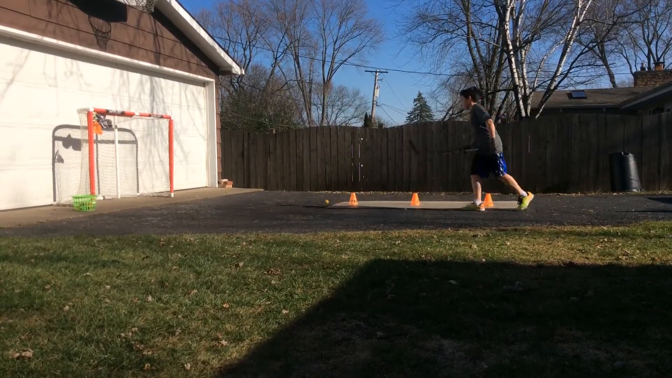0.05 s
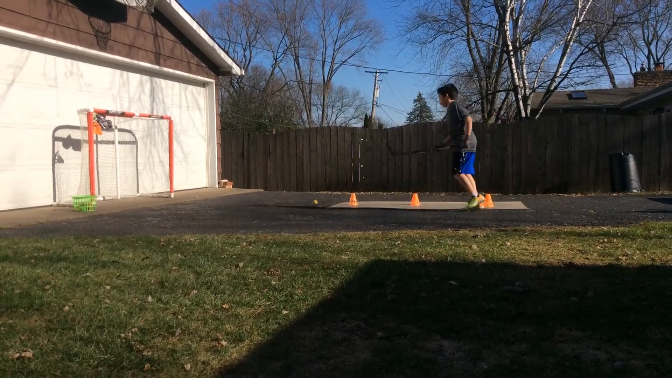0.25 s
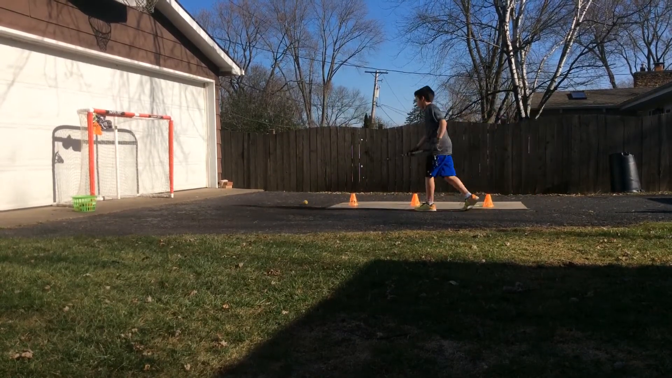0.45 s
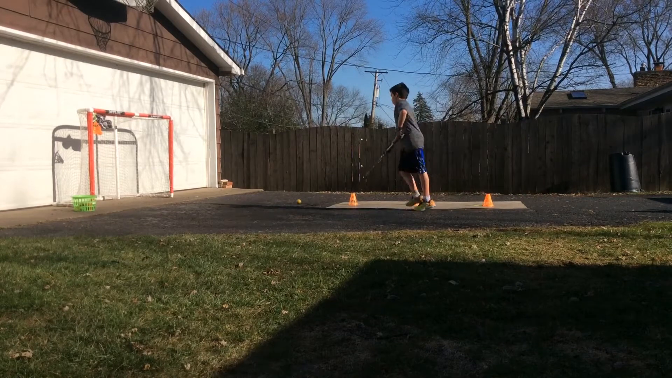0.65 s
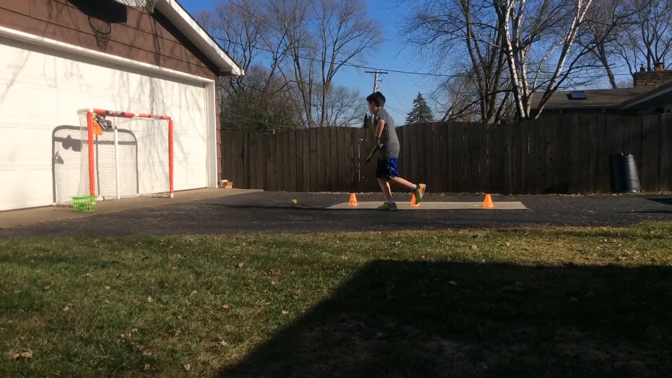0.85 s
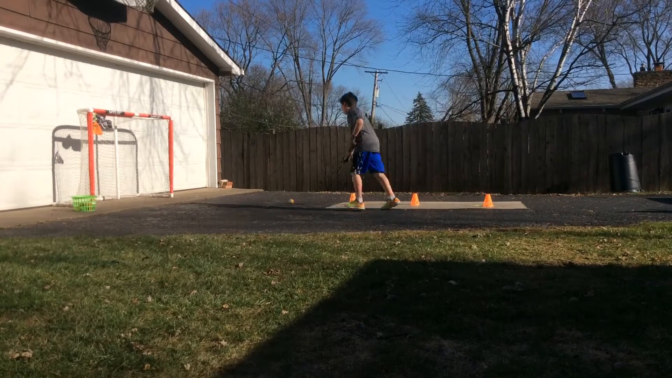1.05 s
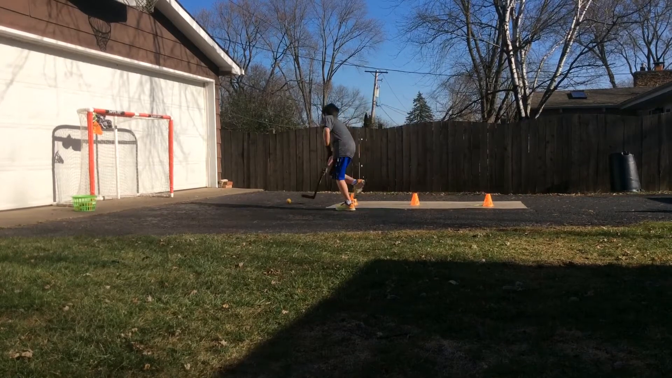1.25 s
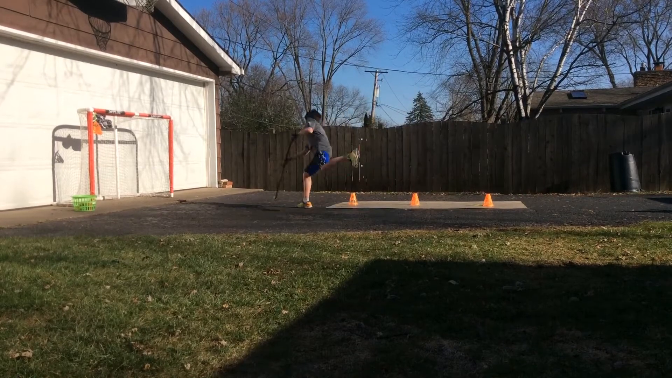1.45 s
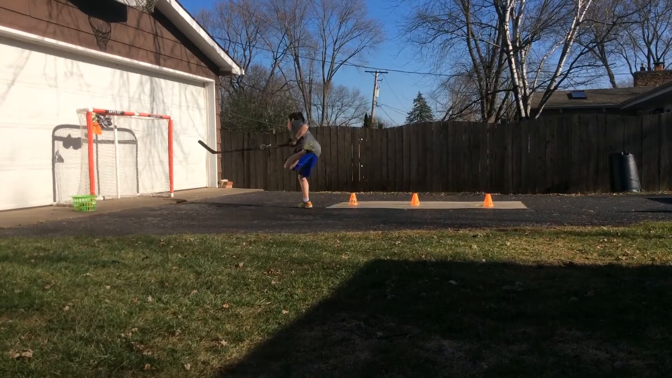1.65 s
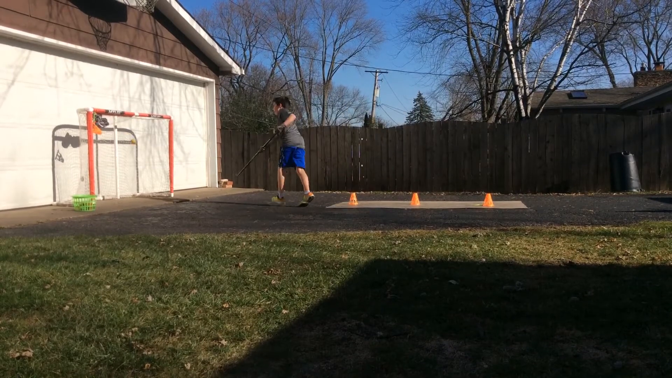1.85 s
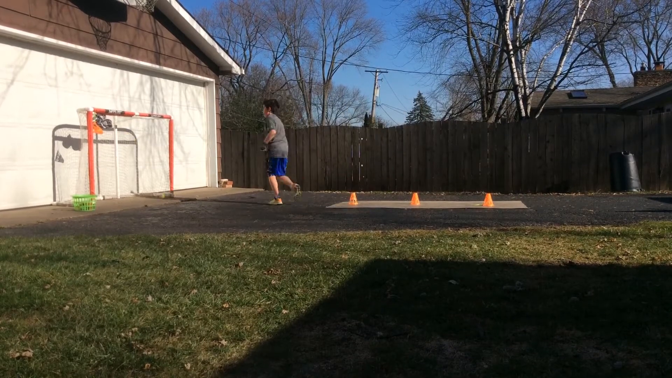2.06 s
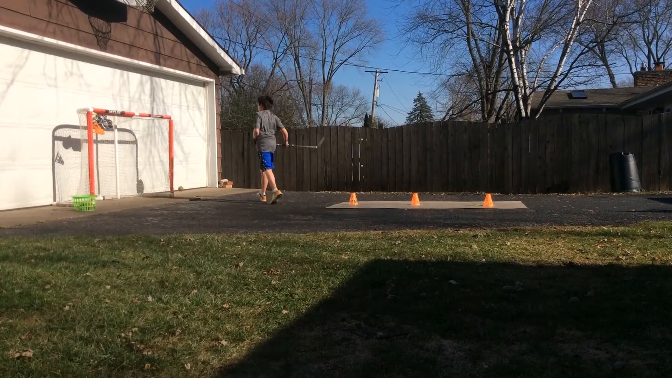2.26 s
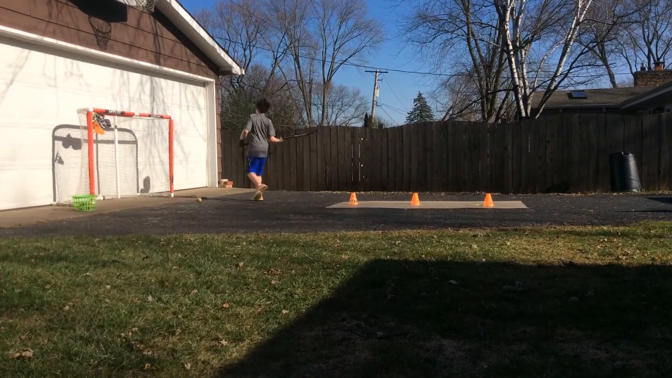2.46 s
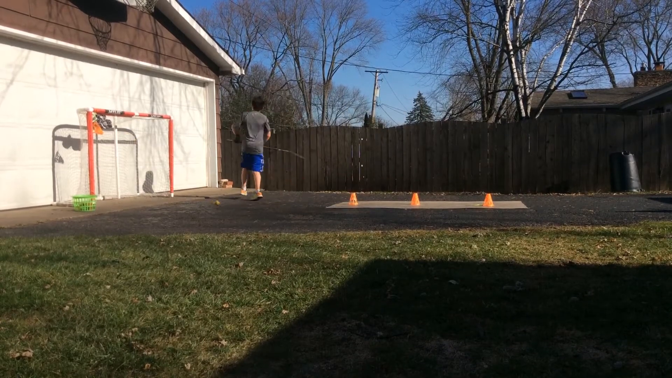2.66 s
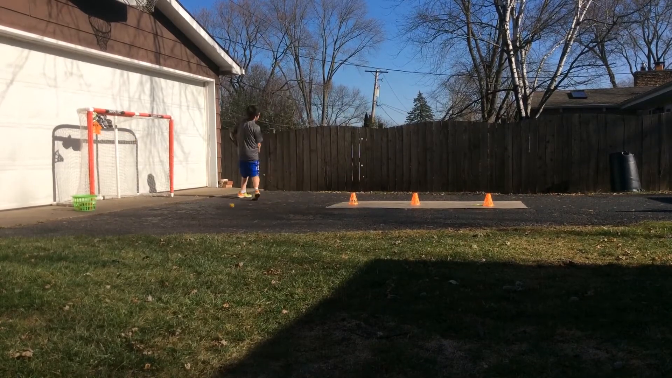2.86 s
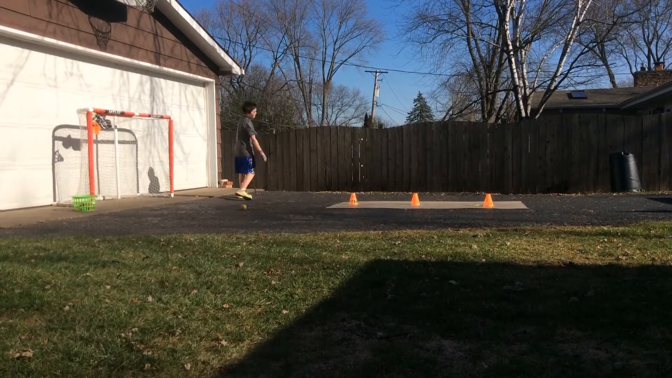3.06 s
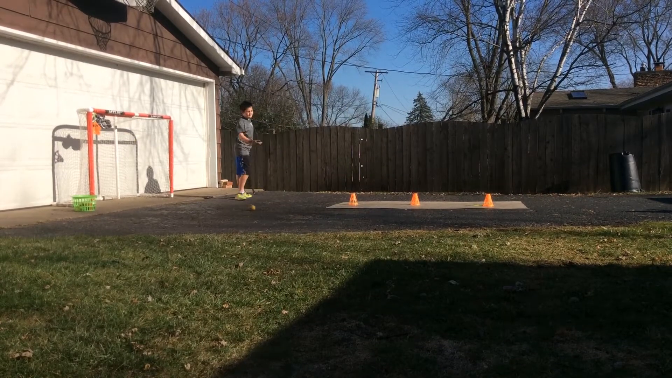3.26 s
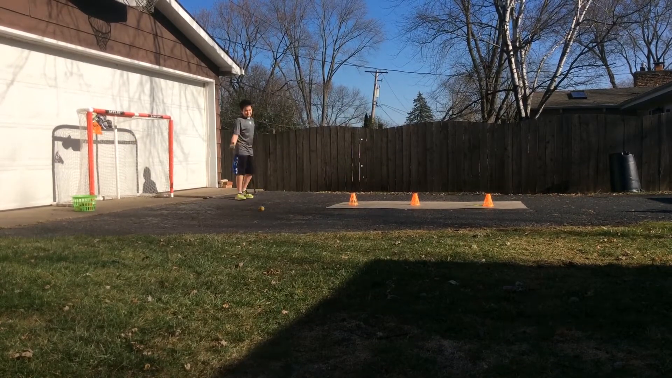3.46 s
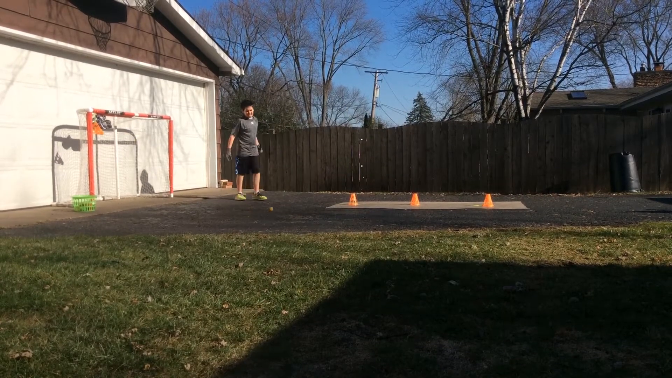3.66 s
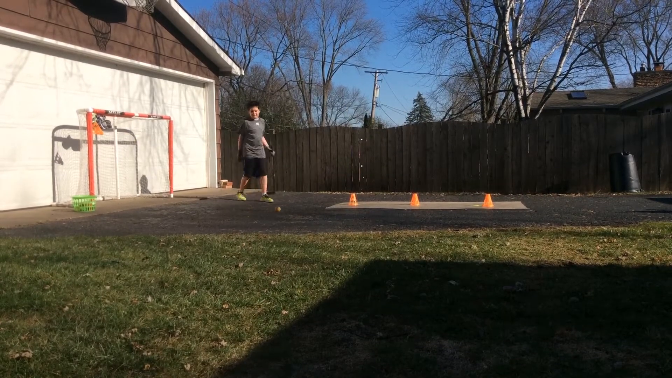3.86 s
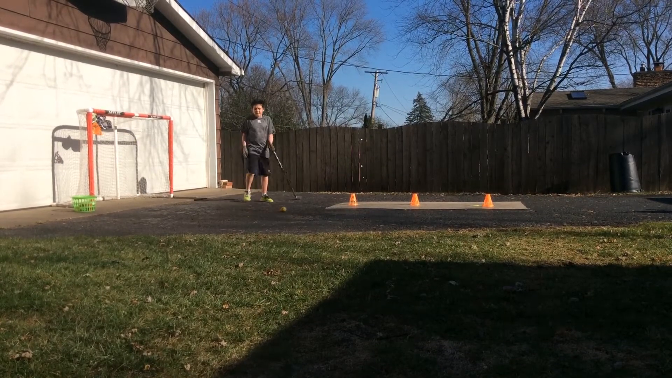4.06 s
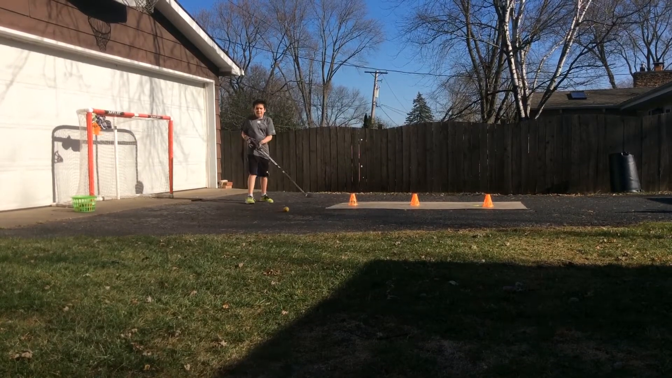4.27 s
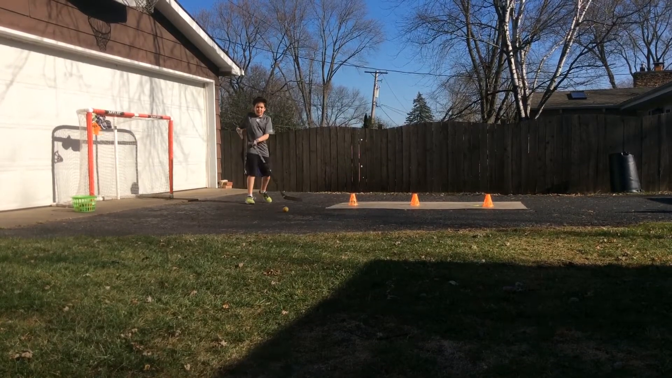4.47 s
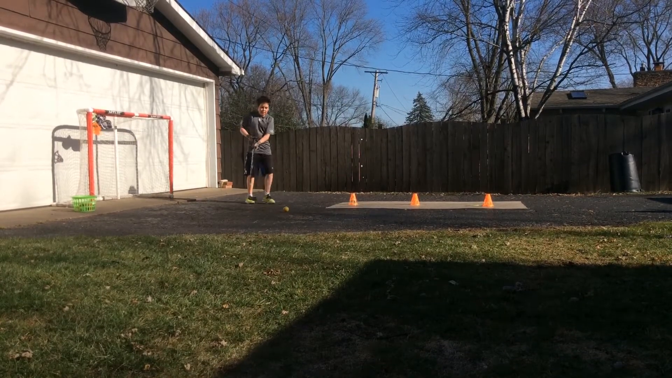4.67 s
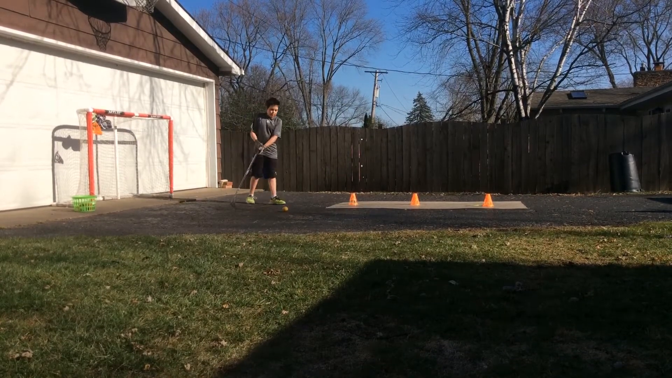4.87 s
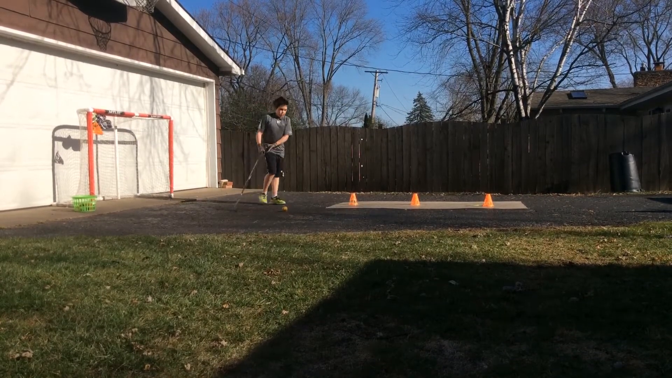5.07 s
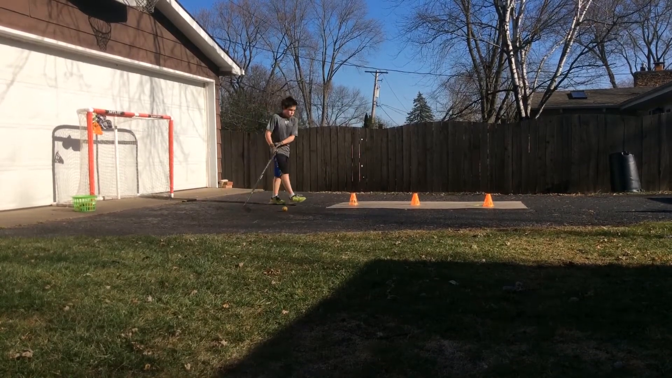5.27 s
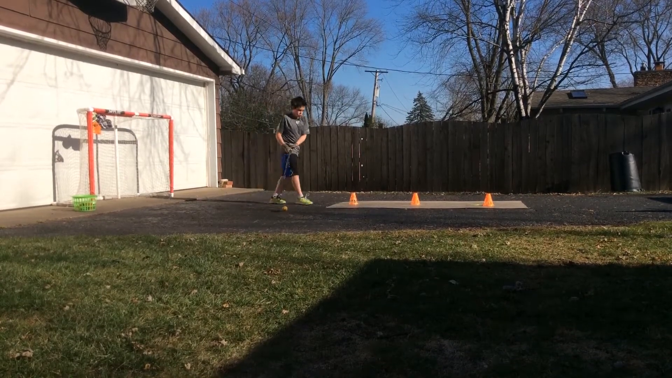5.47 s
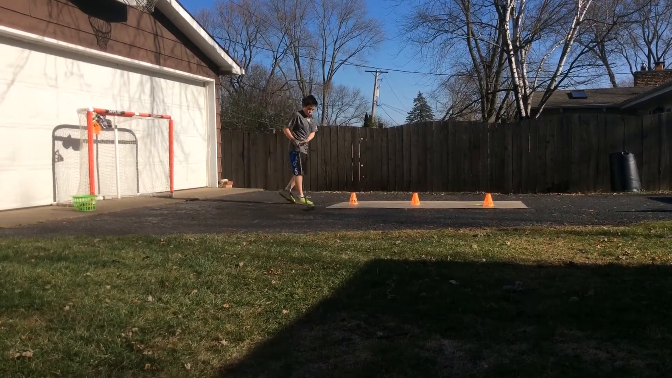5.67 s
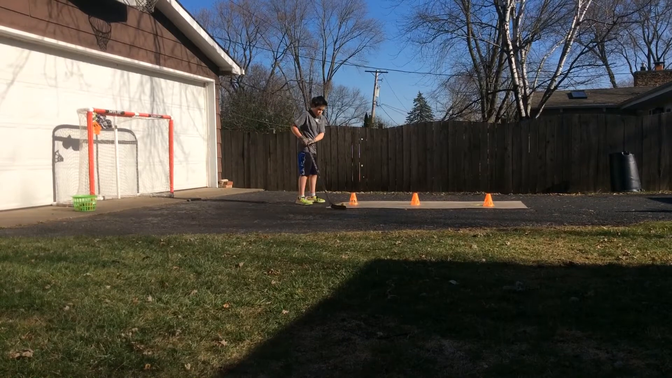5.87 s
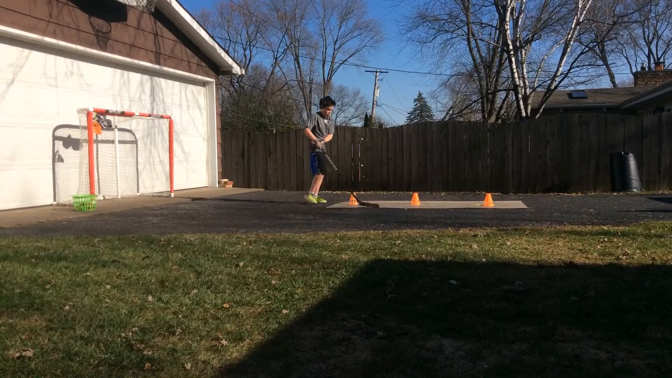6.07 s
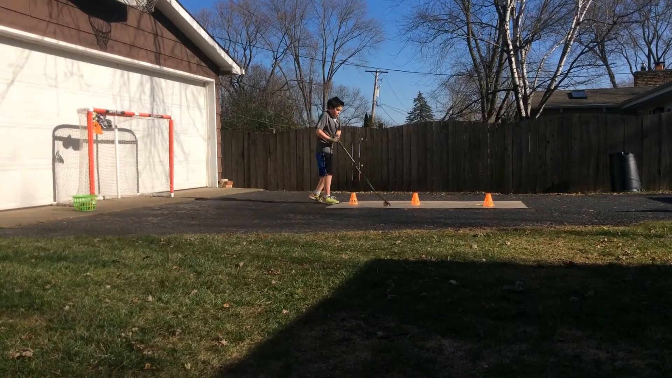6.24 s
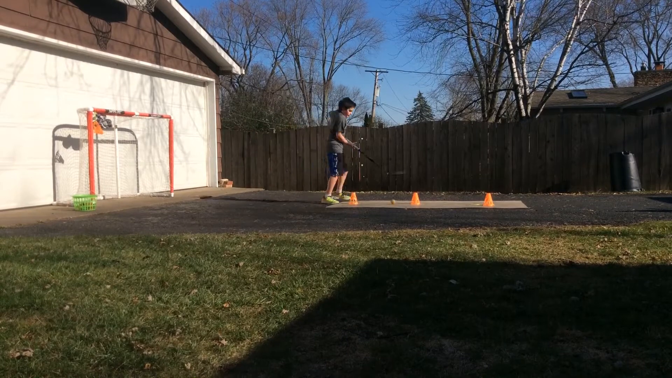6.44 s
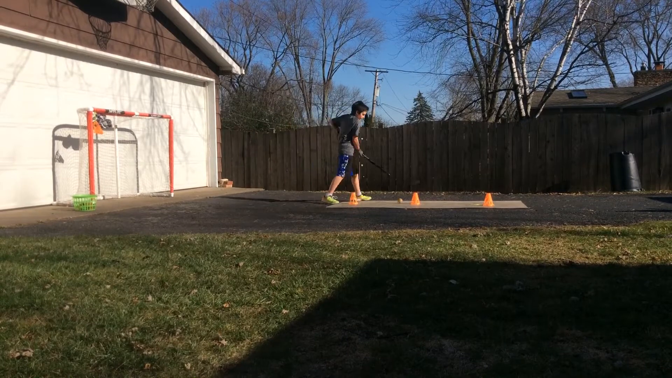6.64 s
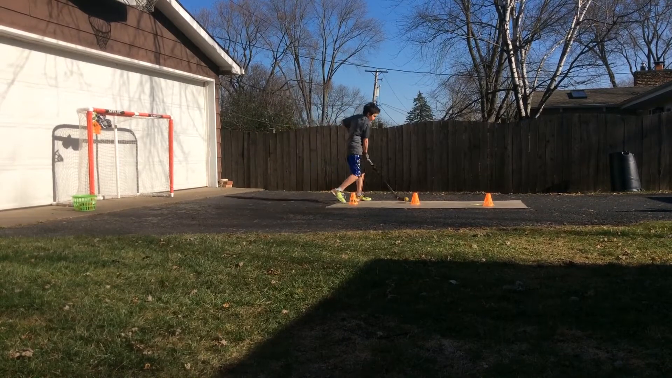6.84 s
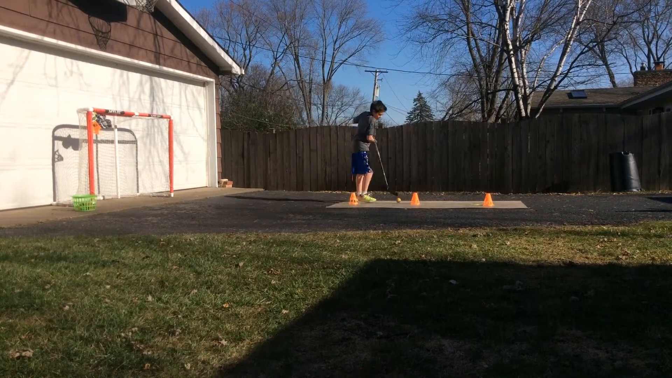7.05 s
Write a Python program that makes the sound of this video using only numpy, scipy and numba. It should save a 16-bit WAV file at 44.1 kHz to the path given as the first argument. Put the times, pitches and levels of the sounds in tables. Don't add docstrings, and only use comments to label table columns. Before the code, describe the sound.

Outdoor stick-and-ball practice heard by a microphone on the grass. It begins quietly with wind rumble, distant road and soft footfalls. A quick burst of dry cracks and low thuds ends in a short metallic clank, then comes one loud clack. Afterwards the blade drags, chatters and taps the ball and pad irregularly to the end, with small birds chirping far off.

```python
import sys
import numpy as np
from scipy import signal
from scipy.fft import rfft, irfft
from scipy.io import wavfile
from scipy.ndimage import uniform_filter1d
from numba import njit

SR = 44100
rng = np.random.default_rng(int(sys.argv[2]) if len(sys.argv) > 2 else 0)


def master(y):
    cut = np.clip(np.atleast_2d(y).T, -1, 1)
    pcm = np.round(cut * 32767)
    wavfile.write(sys.argv[1], SR, pcm.astype(np.int16))


def magnitude_from_level(level_db):
    exponent = np.asarray(level_db, float) / 20
    return 10 ** exponent


N = 313492

# band centre in Hz, decay time t60 in seconds, level in dB.
YARD_ECHOES = [(277, 0.22, 4), (860, 0.16, 1.5), (1600, 0.46, -16), (3200, 0.17, -16.5), (6500, 0.2, -13.5),
               (10770, 0.051, -3)]

# frequency in Hz, level in dB per Hz.
TRAFFIC_SPECTRUM = [(27, -32), (48, -7), (62, 1), (103, -2.5), (135, -8.5), (177, -11), (296, -21.5),
                    (389, -21.5), (510, -26), (787, -22), (1880, -29.5), (3230, -45), (4240, -57),
                    (8370, -45.5), (16500, -60)]
TRAFFIC_DB = -52.5
# time in seconds, rumble level in dB.
GUST_SWELL = [(0.0, -55), (0.59, -56.5), (0.81, -55.5), (3.48, -52.5), (4.3, -56.5), (5.27, -52.5),
              (5.6, -53.5), (6.91, -52), (7.11, -48.5)]

# time in seconds, level in dB.
FAR_CHORUS = [(0.0, -80), (.78, -77.5), (1.27, -77), (1.6, -69), (2.12, -76), (3.068, -69.5), (4.37, -77.5),
              (4.95, -74), (5.48, -65.5), (6.89, -80), (7.11, -68)]
# start in seconds, length in seconds, pitch in Hz, level in dB.
HELD_NOTES = [(0.608, 0.032, 3040, -75), (0.667, 0.037, 3200, -70.5), (1.33, 0.035, 5130, -82),
              (1.956, 0.063, 3280, -70.5), (2.278, 0.045, 3024, -67), (2.483, 0.037, 3700, -69),
              (2.814, 0.02, 3820, -61), (2.854, 0.031, 3620, -63), (2.899, 0.022, 4020, -68),
              (2.7, .025, 5000, -71), (3.609, 0.049, 4260, -69), (3.995, 0.11, 4030, -75.5),
              (4.553, 0.029, 3630, -63.5), (4.606, 0.019, 3200, -62), (4.803, 0.023, 3770, -59),
              (4.831, 0.092, 3010, -60), (1.255, .012, 3900, -69), (1.278, .012, 3800, -72),
              (4.598, 0.053, 3980, -74), (4.64, 0.086, 3300, -77), (4.83, 0.069, 3800, -79),
              (4.897, 0.074, 3010, -81), (5.263, 0.092, 3600, -66.5), (5.736, 0.035, 3740, -71),
              (5.805, 0.032, 5600, -70), (6.514, 0.1, 4190, -74)]
HELD_SAG = 0.0205
# start in seconds, length in seconds, start pitch in Hz, end pitch in Hz, level in dB.
SLURRED_NOTES = [(0.767, 0.052, 3460, 3280, -65), (1.097, 0.1, 3700, 4370, -78),
                 (1.364, 0.043, 3500, 3240, -62), (1.401, 0.081, 3400, 3150, -59.5),
                 (2.385, .014, 3600, 3700, -67), (2.394, 0.048, 5800, 5070, -69),
                 (2.675, 0.027, 3600, 3740, -58.5), (2.691, 0.069, 3460, 3170, -55.5),
                 (2.74, 0.038, 3200, 2800, -59.5), (2.849, 0.021, 3200, 3630, -68),
                 (2.765, 0.034, 2900, 3290, -69), (3.32, 0.032, 4100, 3540, -66),
                 (3.429, 0.041, 3600, 2740, -75), (3.313, 0.048, 3800, 2920, -64.5),
                 (3.391, 0.051, 4130, 2516, -69.5), (3.497, .023, 3500, 5360, -73),
                 (3.505, 0.092, 5480, 3250, -64.5), (4.491, 0.11, 6000, 5000, -74),
                 (4.59, 0.035, 3170, 3630, -67), (4.807, 0.055, 3250, 3470, -61.5),
                 (4.858, 0.047, 2900, 2360, -63.5), (5.206, 0.042, 5770, 5320, -64.5),
                 (5.941, .05, 3980, 3700, -69), (6.835, 0.089, 5170, 5300, -68.5),
                 (6.285, 0.075, 3230, 2857, -59.5)]
SLUR_HALFWAY = 0.67
# start in seconds, length in seconds, top pitch in Hz, level in dB.
ARCHED_NOTES = [
    (1.358, 0.018, 4200, -68),
    (1.377, 0.021, 4350, -67),
    (1.432, .02, 3800, -73),
    (2.8, 0.019, 4100, -64),
    (4.527, 0.031, 4100, -63),
    (4.78, 0.0285, 3820, -64),
    (5.997, 0.061, 3900, -65.5),
    (6.621, 0.073, 3314, -69),
]
ARCH_FROM, ARCH_TO = 0.85, 0.93
FAR_BLUR_PER_DB, CLEAR_DB = 0.001, -62
# start in seconds, end in seconds.
HOARSE_TIMES = [
    (.6, 1.5),
    (3.5, 3.62),
    (4.45, 4.52),
    (4.85, 4.87),
    (6.2, 6.7),
]
HOARSE_BLUR = 0.022

# start in seconds, length in seconds, level in dB.
GRIT_SCUFFS = [(0.102, 0.1, -67.5), (0.795, 0.19, -71), (1.208, 0.081, -60.5), (1.485, 0.11, -49),
               (1.59, 0.14, -48), (1.777, 0.073, -56), (3.02, 0.11, -62), (3.227, 0.12, -51.5),
               (3.514, 0.45, -69), (3.803, 0.12, -61), (4.198, 0.048, -41), (5.637, 0.015, -57.5),
               (5.734, 0.037, -55), (6.328, 0.13, -61), (6.98, 0.1, -58)]
SCUFF_BODY_DB = -5
# start in seconds, length in seconds, level in dB, grit share in dB.
BLADE_DRAGS = [(0.895, 0.093, -58, -11), (1.575, 0.057, -53, -19), (1.779, 0.16, -48.5, -7),
               (2.05, 0.1, -63.5, -6), (2.222, 0.063, -71, -9), (2.464, 0.044, -51, -43.5),
               (2.909, 0.054, -57.5, -8), (3.035, .11, -48.5, -20), (3.168, 0.044, -36, -6),
               (3.226, 0.21, -63.5, -14), (3.858, 0.068, -55, -7.5), (4.212, 0.042, -60, -22),
               (4.244, 0.17, -60, -4), (5.039, 0.089, -44.5, -38), (5.09, 0.33, -59.5, -7),
               (5.401, 0.04, -52, -10), (5.424, 0.14, -52, -8), (5.488, 0.13, -52, -5.5),
               (5.578, 0.058, -57, 0.5), (5.746, 0.082, -53.5, -11), (5.904, 0.069, -54, -42),
               (5.941, 0.24, -56, -6.5), (6.11, 0.091, -55.5, -10.5), (6.215, 0.078, -46.5, -8),
               (6.31, 0.19, -59.5, -26), (6.898, 0.08, -49.5, -5.5)]
# frequency in Hz, level in dB per Hz.
GRIT_SPECTRUM = [(1760, -12.5), (3000, 1.5), (4260, 4.5), (9460, -2), (15100, -17), (16200, -16),
                 (16500, -39)]
# centre in Hz, width in Hz, level in dB.
BLADE_MODES = [(588, 900, 3.5), (1100, 500, -4), (1600, 72, 4.5), (2200, 380, 4), (2970, 1200, -5),
               (3900, 86, -10.5)]
CATCH_DB, CATCH_PER_S = 3, 130

# time in seconds, level in dB.
GRAIN_TICKS = [(0.1037, -41.5), (1.5882, -49), (1.632, -26), (1.608, -33), (1.7901, -31.5), (2.034, -54),
               (2.053, -56), (2.2437, -42), (2.468, -51), (2.653, -45.5), (3.291, -38), (3.309, -48),
               (3.196, -57), (1.7915, -27), (1.798, -36), (5.951, -52), (5.965, -56), (6.011, -52),
               (6.141, -52), (3.23, -42), (3.819, -42), (4.044, -59), (4.2056, -36), (4.2141, -22),
               (4.2225, -44), (4.2265, -44), (4.2358, -52), (5.102, -50), (5.557, -52), (5.642, -48),
               (1.4885, -37), (1.568, -45), (6.985, -46), (4.277, -62), (5.304, -44), (5.396, -37),
               (5.4262, -41), (5.4616, -42), (5.523, -36.5), (5.5816, -42), (5.67, -48), (5.737, -46),
               (6.1263, -47), (6.238, -52), (6.269, -44), (6.9014, -58), (6.9209, -55), (6.9335, -55),
               (7.006, -46)]
TICK_CLACK_DB = -10.5
# time in seconds, level in dB.
PAD_PATS = [(0.1403, -47.5), (.9046, -53), (0.9257, -43.5), (1.4785, -42.5), (1.588, -42), (1.6, -34.5),
            (1.8036, -36), (1.8499, -40), (2.0335, -48), (2.0522, -54), (2.0744, -45.5), (2.2382, -42.5),
            (2.468, -38.5), (2.4928, -46), (2.979, -37), (2.9844, -48), (2.991, -52), (3.1696, -64),
            (3.1789, -44), (3.19, -37), (5.4619, -48), (5.522, -46), (5.582, -58), (5.6146, -44),
            (5.8983, -43.5), (6.2677, -47), (6.9016, -40), (6.9211, -50), (6.9344, -43)]
PAT_BODY_DB, PAT_BODY_HZ = -8, 730
# time in seconds, clack level in dB, hardness in dB.
EDGE_CRACKS = [(0.924, -56, -8), (1.2002, -55, 3), (1.4791, -24.5, -1.5), (1.5236, -31, -3),
               (1.5256, -33, 2), (1.6, -20, -1), (1.609, -27, 4), (1.623, -30, 6), (1.627, -27, -16),
               (1.631, -23, -0.5), (1.8036, -23, -4), (1.821, -52, -13), (2.239, -29.5, -8),
               (2.2522, -36.5, -21), (2.4738, -43, -29), (2.3, -53, -5), (2.917, -45, -23),
               (2.979, -8.5, -11.5), (3.268, -40, -9), (4.2371, -38.5, -12.5), (5.0554, -32, -12),
               (5.205, -48.5, 6), (5.4889, -34.5, 5.5), (5.4937, -29, 0), (5.6372, -35, -6),
               (5.6493, -41, -10), (5.75, -52, 11), (6.062, -47, -9), (6.248, -39.5, -24.5),
               (6.9741, -30.5, 2), (6.986, -44, -9), (6.999, -41, -12), (7.0149, -40.5, -12)]
CRACK_BODY_DB, CRACK_BODY_HZ, CRACK_THUMP_DB = -16.5, 2326, -26
# time in seconds, body level in dB, body pitch in Hz, edge level over the body in dB.
BALL_KNOCKS = [(1.1878, -42.5, 2260, -8), (1.7896, -30, 1510, 0), (1.6, -28.5, 1600, -16),
               (2.477, -41, 1400, -21), (2.985, -32, 1370, 3), (2.9918, -28, 2290, -5), (3, -34, 1600, 7.5),
               (3.0085, -41, 1290, 5), (2.494, -56, 1310, 2), (3.1704, -34, 2200, -17),
               (3.176, -41, 1200, 0), (3.8669, -42, 1780, -17), (4.1998, -45, 1810, 8.5),
               (5.042, -43.5, 1830, 15.5), (5.0754, -44, 1900, 5), (5.396, -57, 1560, 4),
               (5.5974, -51, 2220, 2), (5.9, -40.5, 1890, -3.5), (6.2159, -41, 2310, 7.5),
               (6.975, -40, 2840, -14.5)]
KNOCK_TICK_DB, KNOCK_THUMP_DB = -4.5, -22.5
# start in seconds, level in dB.
BALL_SKITTERS = [
    (5.523, -50),
    (6.3342, -50),
]
SKIPS, SKIP_S, SKIP_LOSS_DB, SKIP_SCATTER_DB, SKIP_HZ = 4, 0.03, -3, 2, 1200
CLACK_HZ, CLACK_HZ_PER_DB = 3700, 83.5
BODY_WIDTH_HZ, SILENT_DB = 420, -120
# time in seconds, peak level in dB, thud pitch in Hz.
HEAVY_THUDS = [(0.142, -52, 221), (0.906, -41.5, 207), (0.924, -41, 132), (1.252, -47, 320),
               (1.586, -27, 144), (1.597, -42, 415), (1.788, -26, 379), (1.793, -30, 164), (2.24, -37, 197),
               (2.035, -36, 355), (2.073, -60, 387), (2.239, -35, 420), (2.468, -27, 175),
               (2.488, -54, 146), (6.9, -53, 448)]

# start in seconds, length in seconds, pitch in Hz, peak level in dB.
BODY_SLIPS = [(1.48, 0.0015, 1740, -29.5), (1.488, 0.0047, 1880, -38), (1.494, 0.016, 2310, -44),
              (1.506, 0.012, 2015, -40), (1.61, 0.0027, 2320, -28.5), (4.2, .012, 1770, -43),
              (4.2001, 0.0052, 2820, -36), (4.212, 0.0063, 1867, -30), (4.213, 0.02, 2380, -36),
              (4.227, 0.0075, 1664, -40), (4.234, 0.011, 1800, -46), (4.235, 0.0085, 3370, -45.5),
              (5.0443, 0.0049, 1750, -29.5), (5.047, 0.0082, 2660, -43), (5.055, 0.0077, 2290, -34.5),
              (5.0552, 0.007, 3220, -31.5), (5.07, 0.0077, 1810, -38), (5.076, .009, 2020, -40),
              (5.082, .006, 1900, -48), (5.097, 0.0085, 2210, -46), (5.397, .015, 3600, -51),
              (5.398, 0.015, 1600, -45), (5.432, 0.0061, 1600, -42), (5.445, 0.041, 1490, -52.5),
              (5.494, 0.0052, 1760, -39.5), (5.497, 0.021, 2640, -46), (5.5, 0.012, 3700, -44.5),
              (5.584, 0.018, 577, -44.5), (5.585, 0.0087, 1880, -53), (5.596, 0.0078, 2210, -45.5),
              (5.61, 0.021, 562, -44), (5.891, 0.0029, 2040, -52), (5.93, 0.0085, 2260, -51),
              (5.947, 0.007, 3970, -55), (5.961, 0.011, 3950, -54), (5.965, 0.0081, 2070, -60),
              (6.005, 0.017, 3200, -64), (6.008, 0.009, 2210, -46), (6.03, 0.01, 3980, -55),
              (6.031, 0.014, 2220, -51), (6.104, 0.012, 1940, -54), (6.217, 0.0077, 2158, -35.5),
              (6.901, 0.0082, 725, -37.5), (6.902, 0.0064, 2070, -53), (6.908, 0.043, 788, -46.5),
              (6.917, 0.034, 2016, -49.5),
              (1.787, 0.0059, 1500, -25), (1.802, 0.0076, 1520, -27), (1.816, 0.0065, 1480, -41),
                 (1.845, 0.0058, 1510, -42), (1.878, 0.0077, 1550, -58), (0.906, 0.0057, 705, -49.5),
                 (1.1865, 0.0069, 2308, -44), (2.494, 0.0056, 1366, -45), (2.987, .03, 798, -36),
                 (2.9799, 0.0025, 2270, -21), (2.9848, 0.0052, 1410, -21), (2.992, 0.0029, 2920, -28),
                 (2.9982, 0.0025, 1726, -16), (3.002, 0.0028, 1770, -19.5), (3.0075, 0.0035, 1300, -25),
                 (3.017, 0.0032, 1100, -33), (3.056, 0.0045, 1850, -45), (3.172, 0.015, 1200, -39.5),
                 (3.004, 0.023, 1260, -38), (3.092, .012, 1414, -47), (1.188, 0.003, 2200, -33),
                 (3.174, 0.037, 2200, -41), (3.184, 0.029, 1248, -39.5), (5.9, 0.0074, 2060, -44.5),
                 (5.903, 0.019, 588, -46), (6.217, 0.0047, 3900, -47), (6.223, 0.0092, 2290, -47),
                 (6.247, .01, 1870, -46), (5.78, .008, 2000, -50.5), (3.188, 0.0082, 1170, -33.5),
                 (3.189, 0.0065, 3600, -44)]
SLIP_WANDER, SLIP_CHATTER_DB, SLIP_RASP = 0.06, 3, 0.45

# time in seconds, peak level in dB, centre in Hz.
DRY_SNAPS = [(1.188, -40, 5270), (1.2012, -41, 6000), (1.4795, -32, 6500), (1.526, -27.5, 5500),
             (1.6005, -16, 6500), (1.624, -21.5, 6030), (1.6278, -23, 4470), (1.632, -36, 4260),
             (1.7905, -13, 9560), (1.7918, -24.5, 4000), (1.8042, -38, 4800), (2.2395, -27.5, 5900),
             (2.474, -47, 7500), (5.489, -40, 6500), (5.6372, -23, 5300), (5.644, -44, 7400),
             (5.649, -30, 5000), (5.6708, -40, 6300), (5.749, -50, 8000), (6.239, -39, 7500),
             (6.2475, -35.5, 4880), (6.2695, -43, 5980), (6.335, -41.5, 7000), (6.366, -48, 5000),
             (6.395, -50, 6000), (6.425, -53, 6000), (6.923, -56, 7970), (6.934, -47, 6000),
             (6.9745, -27, 5560), (6.987, -39, 5600), (7.0065, -35.5, 6000), (7.015, -49, 8000)]
SNAP_FOOT, SNAP_WIDTH = 0.56, 0.68
SNAP_BOUNCE_S, SNAP_BOUNCE_DB = 0.00099, -5.5

# pitch in Hz, decay time t60 in seconds, level in dB.
FRAME_MODES = [(1300, 0.069, -32), (1520, 0.079, -36), (1557, 0.23, -44), (222, 0.2, -39.5)]
FRAME_S = 1.79


@njit
def svf(x, hz, width):
    y, band, low = np.empty(len(x)), 0., 0.
    g, k = np.tan(np.pi * hz / SR), width / hz
    for i in range(len(x)):
        v = (band + g * (x[i] - low)) / (1 + g * (g + k))
        band = 2 * v - band
        low = low + 2 * g * v
        y[i] = k * v
    return y


def steep(x, hz, width):
    return svf(svf(x, 1. * hz, 1. * width), 1. * hz, 2. * width)


def level(x, db):
    return x * magnitude_from_level(db) / np.sqrt(np.mean(x ** 2))


def fade(t, t60):
    return np.exp(-np.log(1000) * t / t60)


def walk(rate):
    k = int(SR / rate)
    held = np.repeat(rng.standard_normal(N // k + 1), k)
    return 1.385 * uniform_filter1d(uniform_filter1d(held, k), k)[:N]


def colour(x, table):
    hz, db = np.transpose(table)
    f = np.fft.rfftfreq(len(x), 1 / SR) + 1
    return irfft(rfft(x) * magnitude_from_level(np.interp(np.log(f), np.log(hz), db)), len(x))


def scatter(x, reflections_per_s, stretch):
    t = np.arange(SR // 2) / SR
    arrives = rng.random(len(t)) < reflections_per_s * (1 + 30 * t) / SR
    taps = rng.standard_normal(len(t)) * arrives
    early_power = np.mean(taps[:SR // 20] ** 2) * SR / 100
    taps = taps / np.sqrt(early_power) * np.clip(t / 0.0047, 0, 1)
    response = 0
    for hz, t60, db in YARD_ECHOES:
        response = response + magnitude_from_level(db) * fade(t, stretch * t60) * svf(taps, 1. * hz, 0.92 * hz)
    return signal.fftconvolve(x, response)[:N]


def traffic_and_wind():
    s, rumble_db = np.transpose(GUST_SWELL)
    gust_db = np.interp(np.arange(N) / SR, s, rumble_db - np.mean(rumble_db))
    out = 0
    for hz in 30 * 2 ** np.arange(0, 9.2, 0.5):
        band = level(svf(rng.standard_normal(N), hz, hz / 2), 10 * np.log10(hz))
        gust_share = np.clip(1.2 - hz / 250, 0.15, 1)
        out = out + band * magnitude_from_level(gust_db * gust_share + 1.68 * walk(7.5))
    return level(colour(out, TRAFFIC_SPECTRUM), TRAFFIC_DB)


def notes():
    rows = [(s, length, hz * (1 + HELD_SAG), hz, hz * (1 - HELD_SAG), db) for s, length, hz, db in HELD_NOTES]
    rows += [(s, length, hz * ARCH_FROM, hz, hz * ARCH_TO, db) for s, length, hz, db in ARCHED_NOTES]
    rows += [(s, length, a, a + SLUR_HALFWAY * (b - a), b, db) for s, length, a, b, db in SLURRED_NOTES]
    return rows


def finches():
    out, quaver = np.zeros(N), walk(500)
    burr = 0.85 + 0.7 * walk(450)
    for s, length, start_hz, middle_hz, end_hz, db in notes():
        i, u = int(s * SR), np.linspace(0, 1, int(length * SR))
        span = slice(i, i + len(u))
        hz = start_hz * (1 - u) * (1 - 2 * u) + 4 * middle_hz * u * (1 - u) + end_hz * u * (2 * u - 1)
        hoarse = any(a < s < b for a, b in HOARSE_TIMES)
        blur = 0.014 + FAR_BLUR_PER_DB * max(CLEAR_DB - db, 0) + HOARSE_BLUR * hoarse
        phase = 2 * np.pi * np.cumsum(hz * (1 + blur * quaver[span])) / SR
        out[span] += magnitude_from_level(db) * burr[span] * np.sin(np.pi * u) ** 0.13 * np.sin(phase)
    haze = 0
    for hz in (2796.0, 3600.0, 3980.0, 4300.0):
        haze = haze + magnitude_from_level(2.4 * walk(9.1)) * svf(rng.standard_normal(N), hz, 1000.0)
    s, chorus_db = np.transpose(FAR_CHORUS)
    chorus_gain = magnitude_from_level(np.interp(np.arange(N) / SR, s, chorus_db))
    trees = 0.75 * out + magnitude_from_level(5) * scatter(out, 1500, 1.25)
    return trees + chorus_gain * level(haze, -1.6)


def drags():
    return ([(s, length, db, db + SCUFF_BODY_DB) for s, length, db in GRIT_SCUFFS]
            + [(s, length, db + grit_db, db) for s, length, db, grit_db in BLADE_DRAGS])


def scuffs():
    grit_gain, body_gain = np.zeros(N + SR), np.zeros(N + SR)
    for s, length, grit_db, body_db in drags():
        i, u = int(s * SR), np.linspace(0, 2, int(2 * length * SR))
        touch = np.clip(u / 0.06, 0, 1) * np.exp(-(u / 0.65) ** 1.8)
        grit_gain[i:i + len(u)] += magnitude_from_level(grit_db) * touch
        body_gain[i:i + len(u)] += magnitude_from_level(body_db) * touch
    plucks = np.clip(rng.standard_normal(N), -2.2, 2.2) * (rng.random(N) < 7000 / SR)
    uneven_db = 1.8 * np.minimum(rng.exponential(size=N), 3) + 2.5 * walk(120)
    ticks = plucks * magnitude_from_level(uneven_db)
    body = 0
    for hz, width, db in BLADE_MODES:
        body = body + magnitude_from_level(db + CATCH_DB * walk(CATCH_PER_S)) * steep(ticks, hz, width)
    grit = colour(ticks, [(1500, -31)] + GRIT_SPECTRUM)
    return grit_gain[:N] * level(grit, 0) + body_gain[:N] * level(body, 0)


def contacts():
    rows = [(s, db + TICK_CLACK_DB, db, SILENT_DB, SILENT_DB, PAT_BODY_HZ) for s, db in GRAIN_TICKS]
    rows += [(s, SILENT_DB, SILENT_DB, db, db + PAT_BODY_DB, PAT_BODY_HZ) for s, db in PAD_PATS]
    rows += [(s, db, db + hard, db + CRACK_THUMP_DB, db + CRACK_BODY_DB, CRACK_BODY_HZ)
             for s, db, hard in EDGE_CRACKS]
    rows += [(s, db + edge, db + edge + KNOCK_TICK_DB, db + KNOCK_THUMP_DB, db, hz)
             for s, db, hz, edge in BALL_KNOCKS]
    chance = rng.standard_normal((len(BALL_SKITTERS), SKIPS, 4))
    for (s, db), run in zip(BALL_SKITTERS, chance):
        for k, (late, a, b, c) in enumerate(run):
            hop_s = s + SKIP_S * k * (1 + 0.008 * late)
            hop_db = db + k * SKIP_LOSS_DB
            clack_db = hop_db - 8 + SKIP_SCATTER_DB * a
            tick_db = hop_db + SKIP_SCATTER_DB * b
            body_db = hop_db - 5.5 + SKIP_SCATTER_DB * c
            body_hz = SKIP_HZ * (1.51 + 0.34 * np.tanh(a + c))
            rows.append((hop_s, clack_db, tick_db, hop_db - 7, body_db, body_hz))
    return rows


def blows():
    out, t = np.zeros(N + 4096), np.arange(4096) / SR
    for s, clack_db, tick_db, thump_db, body_db, body_hz in contacts():
        rough, (a, b) = rng.standard_normal(4096), rng.random(2)
        burst = rough * (fade(t, 0.0024) + 0.12 * fade(t, 0.02)) * np.clip(t / 0.0005, 0, 1) ** 2
        clack_hz = CLACK_HZ + CLACK_HZ_PER_DB * np.clip(tick_db - clack_db + 10.5, 0, 15)
        clack = steep(steep(burst, clack_hz, 0.88 * clack_hz), clack_hz, 0.857 * clack_hz)
        tick = steep(svf(burst, 7500.0, 6200.0), 8000.0, 6800.0)
        push = (1 + 0.6 * rough) * fade(t, 0.003) * np.clip(t / 0.0002, 0, 1)
        main_mode = steep(push, body_hz, BODY_WIDTH_HZ)
        side_mode = steep(push, body_hz * (0.64 + 1.1 * a), 1300.0)
        body = steep(main_mode + 0.76 * side_mode, 1800.0, 3578.0)
        thump = steep(push, 428.0 + 300 * b, 340.0)
        i = int(s * SR)
        layers = (clack, clack_db), (tick, tick_db), (body, body_db + 7.5), (thump, thump_db + 4.5)
        for layer, db in layers:
            out[i:i + 4096] += magnitude_from_level(db) * layer / np.abs(layer).max()
    return out[:N]


def thuds():
    out, t = np.zeros(N + 4096), np.arange(4096) / SR
    for s, db, hz in HEAVY_THUDS:
        swing = np.sin(2 * np.pi * hz * t) * fade(t, 0.04) * (1 - fade(t, 0.012)) ** 2
        out[int(s * SR):int(s * SR) + 4096] += magnitude_from_level(db) * swing
    return out[:N]


def slips():
    out, wander, chatter, rasp = np.zeros(N), walk(500), walk(700), walk(2500)
    for s, length, hz, db in BODY_SLIPS:
        i, u = int(s * SR), np.linspace(0, 2, int(2 * length * SR))
        span = slice(i, i + len(u))
        drift = wander[span] - wander[i:i + len(u) // 2].mean()
        phase = 2 * np.pi * np.cumsum(hz * (1 + SLIP_WANDER * drift)) / SR
        swell = u / 0.3 * np.exp(1 - u / 0.3)
        grip = swell * magnitude_from_level(SLIP_CHATTER_DB * chatter[span]) * (1 + SLIP_RASP * rasp[span])
        same_power = np.sqrt(np.mean(swell ** 2) / np.mean(grip ** 2))
        out[span] += magnitude_from_level(db) * grip * same_power * np.sin(phase)
    return out


def snaps():
    out, click = np.zeros(N), np.zeros(512)
    click[0], click[int(SNAP_BOUNCE_S * SR)] = 1, -magnitude_from_level(SNAP_BOUNCE_DB)
    for s, db, hz in DRY_SNAPS:
        low_cut = signal.butter(6, SNAP_FOOT * hz, "high", fs=SR, output="sos")
        snap = steep(signal.sosfilt(low_cut, click), hz, SNAP_WIDTH * hz)
        out[int(s * SR):int(s * SR) + len(snap)] += magnitude_from_level(db) * snap / np.abs(snap).max()
    return out


def goal_frame():
    out, t = np.zeros(N), np.arange(SR // 2) / SR
    ring = sum(magnitude_from_level(db) * np.sin(2 * np.pi * hz * t) * fade(t, t60) for hz, t60, db in FRAME_MODES)
    rattle = magnitude_from_level(2.5 * walk(100)[:len(t)])
    i = int(FRAME_S * SR)
    out[i:i + len(t)] += ring * np.clip(t / 0.003, 0, 1) * rattle
    return out


def scene():
    near = blows() + thuds() + snaps() + goal_frame()
    slip = slips()
    yard = scatter(near, 2500, 0.66) + magnitude_from_level(-7.0) * scatter(slip, 2600, 0.78)
    return (near + slip + yard + scuffs() + finches() + traffic_and_wind())[None]


def top_cut(x):
    return signal.sosfilt(signal.butter(12, 16820, fs=SR, output="sos"), x)


def record(dry):
    roll_off = signal.butter(8, 16500, fs=SR, output="sos")
    mix = signal.sosfilt(roll_off, dry)
    return top_cut(mix)


dry = scene()
out = record(dry)
master(out)
```